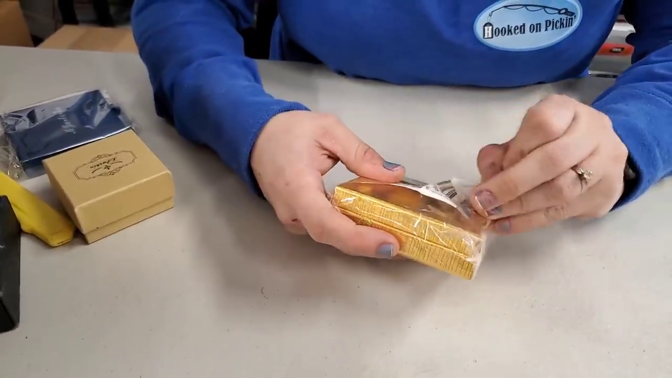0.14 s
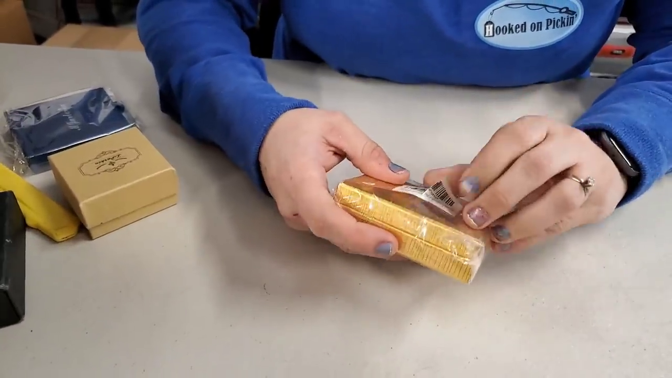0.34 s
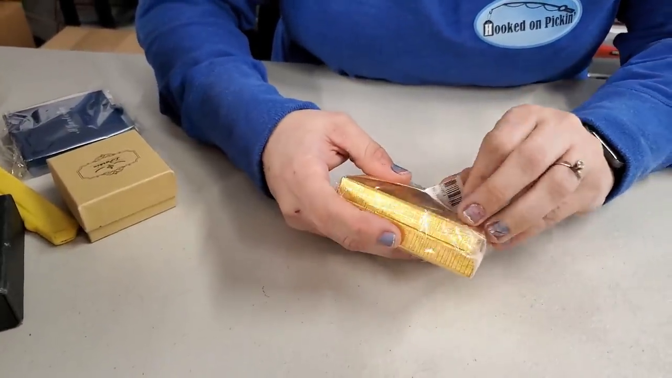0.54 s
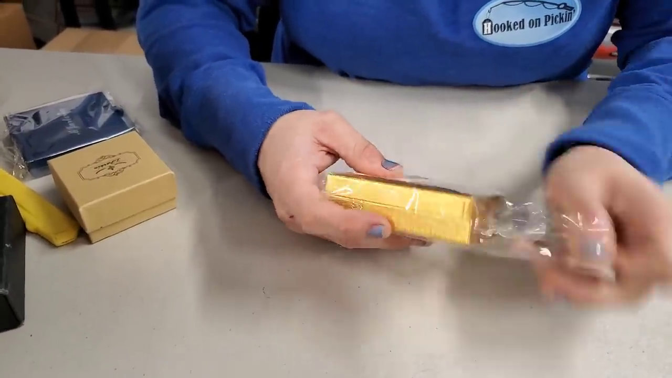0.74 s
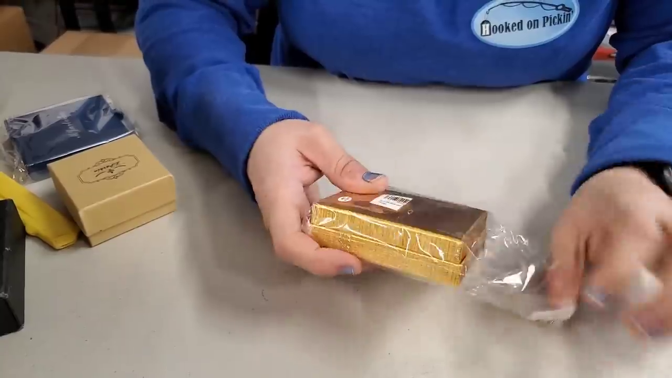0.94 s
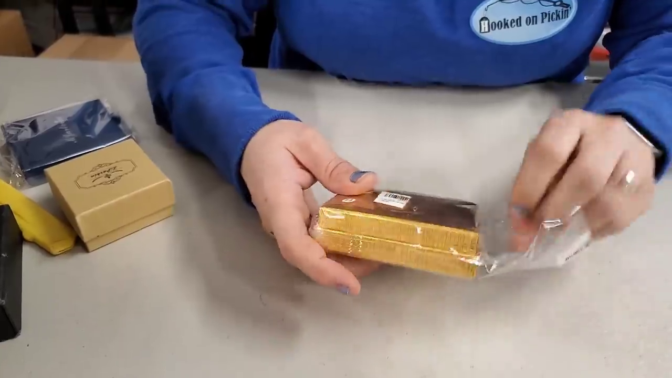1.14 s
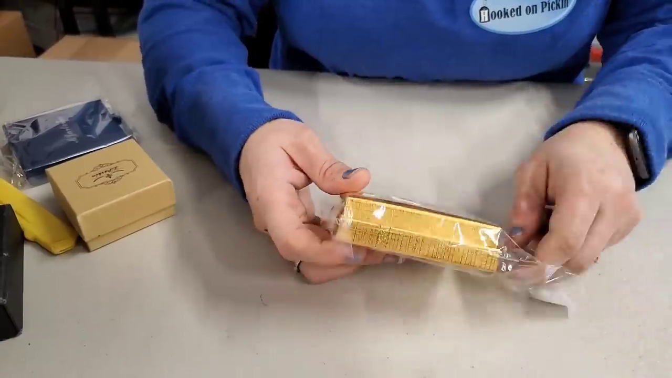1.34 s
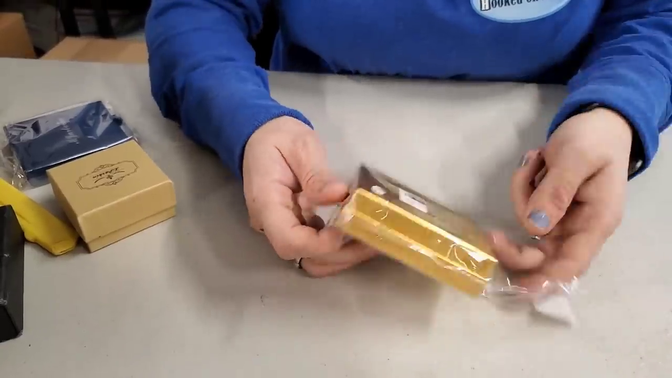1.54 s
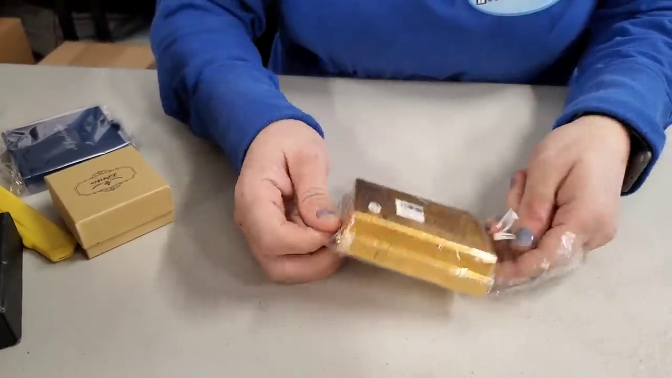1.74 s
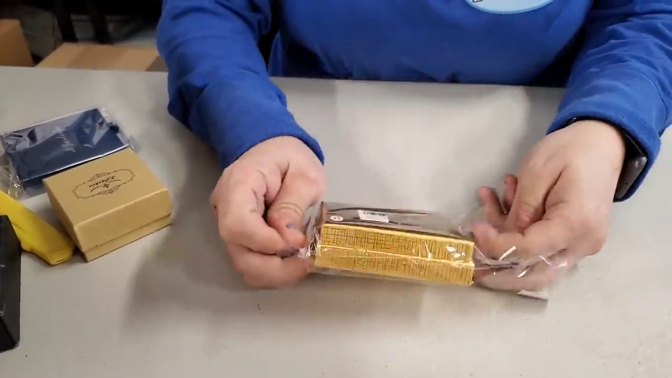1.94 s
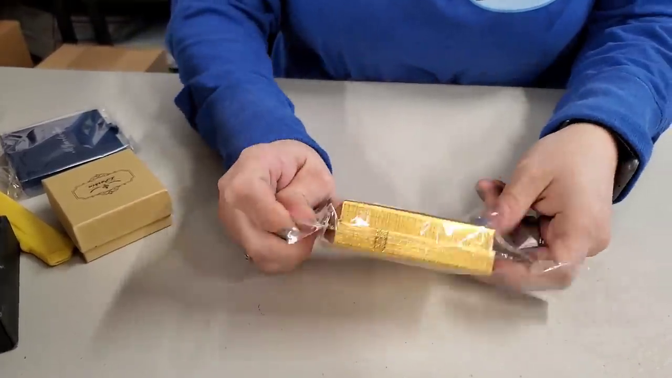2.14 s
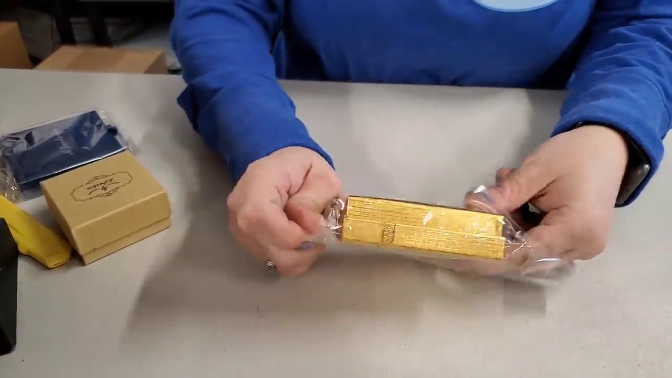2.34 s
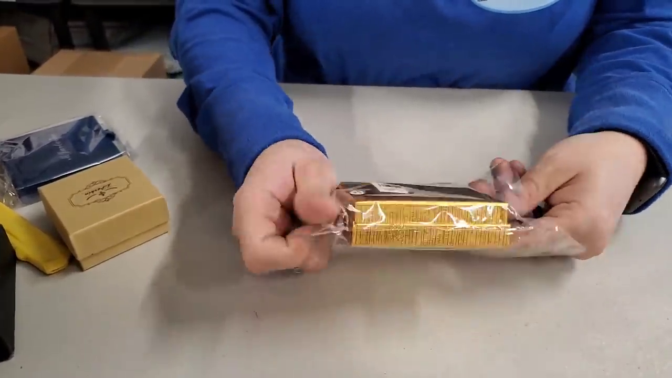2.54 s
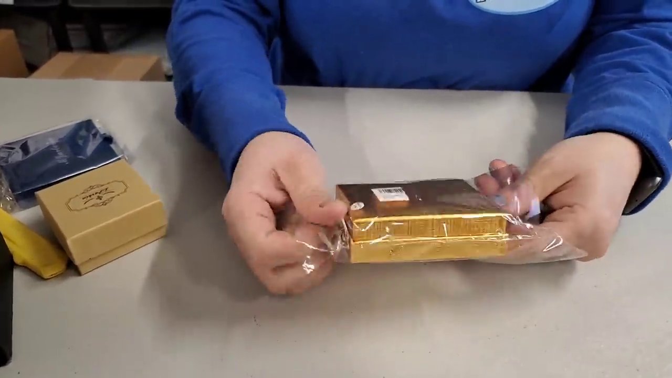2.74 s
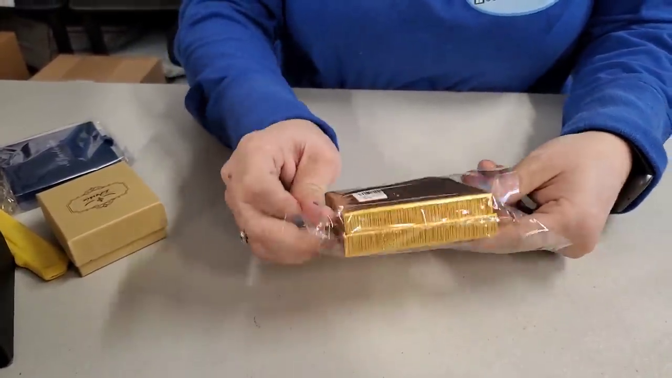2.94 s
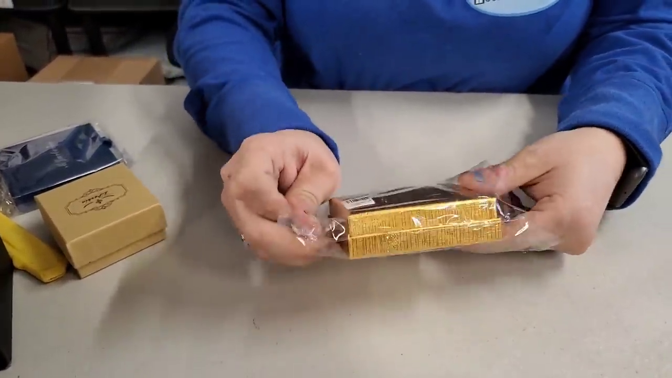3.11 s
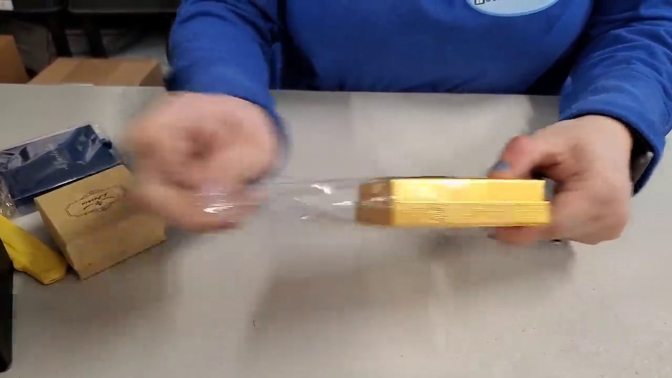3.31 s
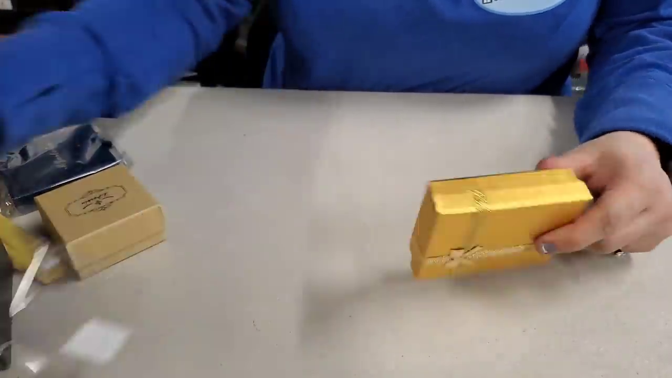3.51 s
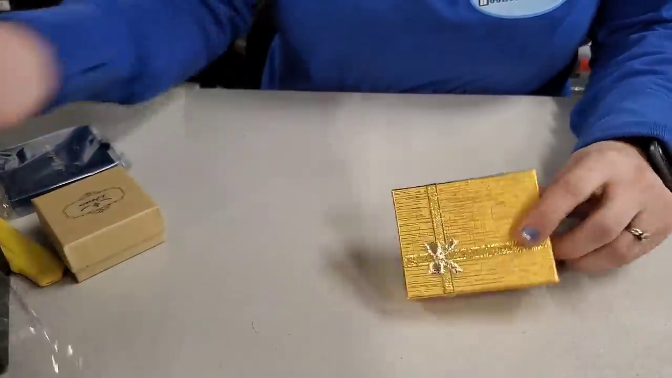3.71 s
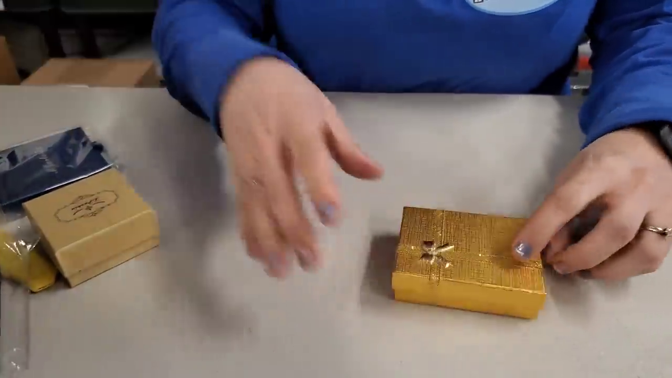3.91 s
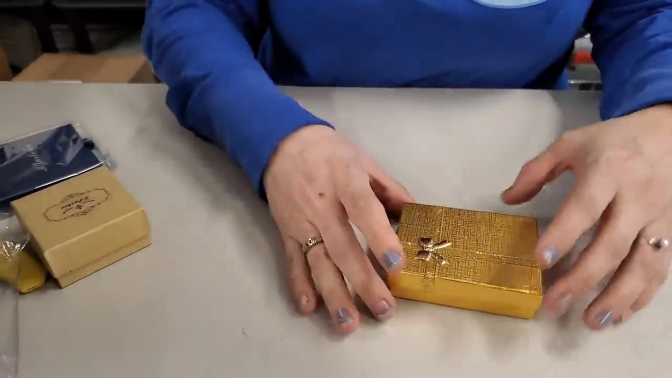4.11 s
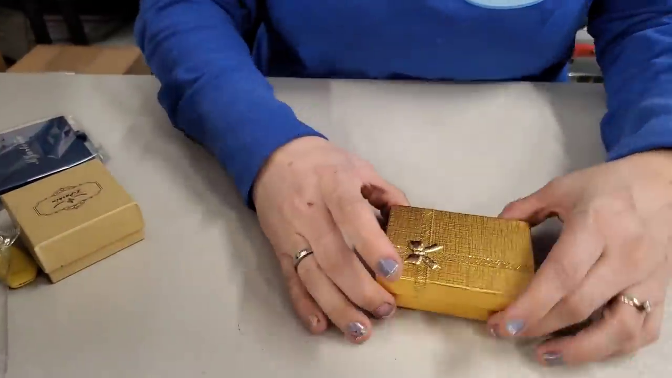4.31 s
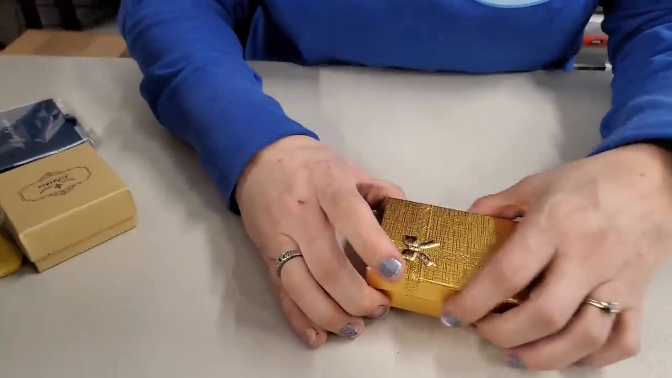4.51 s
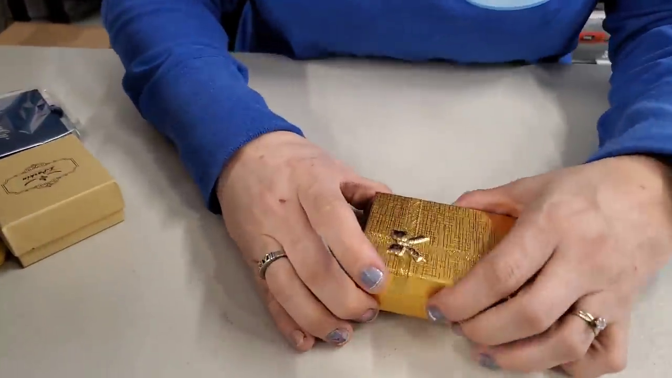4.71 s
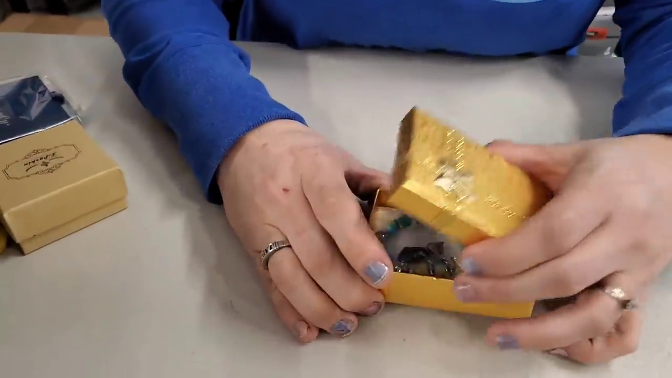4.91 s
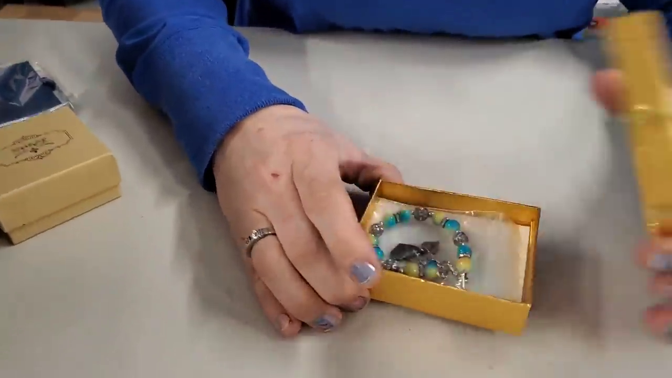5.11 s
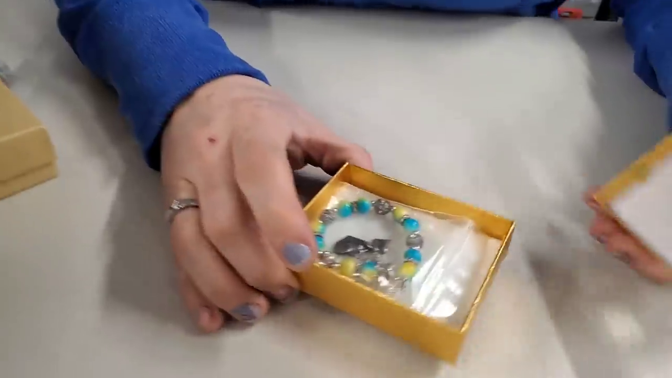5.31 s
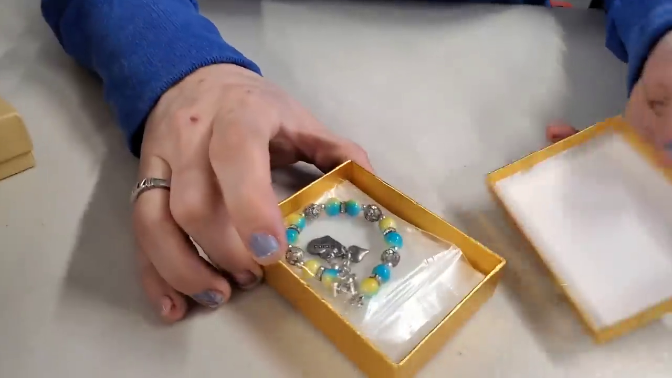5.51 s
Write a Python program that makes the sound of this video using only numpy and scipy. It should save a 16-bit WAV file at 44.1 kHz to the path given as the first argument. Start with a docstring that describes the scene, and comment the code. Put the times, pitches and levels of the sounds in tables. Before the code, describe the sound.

Loud plastic crinkling fills the first part, snaps popping over a continuous rustle with brief pauses for regripping and a table bump midway. The film slides off in one swish, and a dull knock follows. Afterwards come light taps of box and fingers, faint rubbing on card, a short scrape of the lid and a gentle set-down. Heard very close, nearer the right, with a short room tail and low background rumble.

```python
"""At a table, close to a stereo microphone: two hands peel stiff clear film off a small cardboard box.
Film: shaped noise bursts, dense small ones over a swish, loud snaps, one long pull. Box, wrists and lid
bump the table: struck decaying modes. Fingers rub and tick on card, the lid scrapes up and is laid down:
coloured hiss and dry bursts. Below lies a low rumble; a short room tail follows the near sounds.
The scene sits nearer the right microphone port, whose cavity rings in the treble."""
import sys
import numpy as np
from scipy import signal
from scipy.fft import rfft, irfft, next_fast_len
from scipy.io import wavfile
from scipy.ndimage import uniform_filter1d

SR = 44100
rng = np.random.default_rng(int(sys.argv[2]) if len(sys.argv) > 2 else 0)


def bounce(signal):
    """Save signal as a 16-bit WAV file at the path given by the first command-line argument."""
    frames = np.transpose(np.atleast_2d(signal))
    limited = np.clip(frames, -1, 1)
    pcm = np.round(limited * 32767).astype(np.int16)
    wavfile.write(sys.argv[1], SR, pcm)


N = 245063

# Table levels are relative: the functions add fixed offsets.


def amp(db):
    """dB to gain."""
    return 10 ** (np.asarray(db) / 20)


def unit(x):
    """Scaled to rms 1."""
    return x / np.sqrt(np.mean(x ** 2) + 1e-20)


def along(points, hz):
    """(f/Hz, value, ..) points read on a log axis, one row per value column."""
    f, *cols = np.transpose(points)
    return np.squeeze([np.interp(np.log(hz + 1), np.log(f + 1), c) for c in cols])


def curves(rows, t):
    """Each column after the time, read at the times t."""
    s, *cols = np.transpose(rows)
    return [np.interp(t, s, c) for c in cols]


def ends(hz, low_db, high_db, low_hz, high_hz):
    """dB of a spectrum whose two ends are lifted or lowered apart from its middle."""
    low = 1 / (1 + (hz / low_hz) ** 4)
    high = 1 / (1 + (high_hz / (hz + 1)) ** 8)
    return low * low_db + high * high_db


def bell(hz, centre_hz, width):
    """Resonance of height 1 on a log axis."""
    return np.exp(-(np.log(hz / centre_hz) / width) ** 2)


# likeness of the two ports: f/Hz, left-right correlation
LIKENESS = [(60, 0.92), (300, 0.97), (650, 0.86), (1400, 0.48), (3000, 0.068), (7000, 0.073)]


def paired(z, hz):
    """Two unrelated spectra mixed to be as alike as two ports hear them."""
    turn = np.arccos(np.clip(along(LIKENESS, hz.ravel()), 0, 1)).reshape(hz.shape) / 2
    common, apart = np.cos(turn) * z[0], np.sin(turn) * z[1]
    return np.array([common + apart, common - apart])


def sides(pan_db):
    """Left and right gains; negative pans right."""
    return amp(np.array([pan_db / 2, -pan_db / 2]))


def hiss(colour_db, patchy_db, size=256):
    """Stereo noise with patches of random gain; colour_db(hz, t) shapes it."""
    hz, t, z = signal.stft(rng.standard_normal((2, N)), SR, nperseg=size)
    field = uniform_filter1d(rng.standard_normal(z.shape[1:]), size=5, axis=0)
    field = uniform_filter1d(field, size=3, axis=1)
    z = paired(z, hz[:, None]) * amp(patchy_db * unit(field) + colour_db(hz[:, None], t))
    return signal.istft(z, SR, nperseg=size)[1][:, :N]


def causal(gain):
    """The same gains with minimum phase: a filter that rings only after it is struck."""
    cepstrum = irfft(np.log(gain + 1e-6))
    half = cepstrum.shape[-1] // 2
    cepstrum[..., 1:half] *= 2
    cepstrum[..., half + 1:] = 0
    return np.exp(rfft(cepstrum))


# film radiation: f/Hz, level/dB
FILM_COLOUR = [(200, -21.5), (450, -19), (780, -6), (1000, -5.5), (1500, -3), (2500, -1), (6000, -2.5),
               (10000, -6), (16000, -5)]


def pops(s, db, pitch_hz, low_db, bright_db, top_db, ms, ring_db, crack_db):
    """Sharp crack inside a spit of noise, strongest round the pitch of the panel that flips free."""
    size, lead = 768, 256  # samples; samples before the peak
    t_ms = (np.arange(size) - lead) / SR * 1000
    hz = np.fft.rfftfreq(size, 1 / SR)
    spit_env = amp(np.where(t_ms < 0, 28 * t_ms, -19 * t_ms) / ms[:, None])  # quick swell, slower fall
    crack_env = amp(crack_db + np.where(t_ms < 0, 40 * t_ms, -25 * t_ms))
    crack_env = crack_env * 3 / ms[:, None]  # long creases crack less
    noise = rng.standard_normal((len(s), 2, size)).swapaxes(0, 1)
    z = paired(rfft(noise * (spit_env + crack_env)), hz)

    panel_db = ring_db * bell(hz + 1, pitch_hz[:, None], 0.15)
    tilt_db = bright_db[:, None] / (1 + (4500 / (hz + 1)) ** 3)
    gain = amp(along(FILM_COLOUR, hz) + panel_db + tilt_db)
    band = (hz > 1500) * (hz < 10000)  # levels are set in this band, before the ends are bent
    strength = np.sqrt(np.mean(abs(z * gain * band) ** 2, axis=(0, 2)) / ms)
    gain = gain * amp(ends(hz, low_db[:, None], top_db[:, None], 2040, 7660))

    pan_db = -6 + 0.5 * rng.standard_normal(len(s))  # all to the right, slight random spread
    bursts = irfft(z * causal(gain)) * (sides(pan_db) * amp(db + 7.5) / strength)[..., None]
    at = (np.round(s * SR).astype(int)[:, None] + np.arange(size)).ravel()
    return np.array([np.bincount(at, side.ravel(), N + 2 * size)[lead:][:N] for side in bursts])


# moving film: t/s, level/dB, low end/dB
FILM_MOTION = [(0.0, -32.5, -14), (0.2, -34.5, -13.5), (0.41, -41.5, -7), (0.62, -32.5, -10),
               (0.72, -29, -14.5), (0.85, -23.5, -13), (0.95, -34.5, -7.5), (1.25, -35.5, -12),
               (1.44, -31, -8), (1.65, -34.5, -7), (1.85, -36, -3), (2.08, -30, -7.5), (2.42, -32.5, -8),
               (3.16, -33, -12.5), (3.3, -29, -12), (3.45, -30, -7.5), (3.52, -34, -16), (3.67, -33.5, -13),
               (3.7, -44, -1), (3.76, -66, -13)]
# fingers stop and regrip: middle t/s, length/s, depth/dB (negative lifts)
REGRIPS = [(0.441, 0.04, 6), (0.484, 0.071, 9.5), (0.584, 0.023, 10.5), (1.045, 0.037, 4.5),
           (1.187, 0.034, 20), (1.497, 0.13, 7.5), (1.797, 0.032, 10), (2.07, 0.082, 8.5),
           (2.493, 0.041, 2.5), (2.8, 0.015, -2), (3.202, 0.04, 13), (3.527, 0.034, 4), (3.591, 0.06, 15.5)]
FILM_TREBLE_DB, DULLING_DB_PER_DB = 2.5, 0.2  # treble; treble lost per dB of pause


def film_at(t):
    """Level, low end and treble of the moving film at t; pauses hush and dull it."""
    db, low_db = curves(FILM_MOTION, t)
    hush_db = sum(depth * np.exp(-(2 * (t - s) / length) ** 4) for s, length, depth in REGRIPS)
    return db - hush_db, low_db, FILM_TREBLE_DB - DULLING_DB_PER_DB * hush_db


def crackle():
    """Many small creases at chance moments over the swish of sliding film."""
    end_s = FILM_MOTION[-1][0]
    draw = rng.random((1050, 6))
    s = draw[:, 0] * end_s
    db, low_db, high_db = film_at(s)
    size_db = -3.6 * np.log(draw[:, 1] + 0.022)  # few large, many small
    clump_db = 2.26 * np.interp(s, np.linspace(0, 4, num=200), rng.standard_normal(200))
    pitch_hz = 1500 * 7 ** draw[:, 2]
    ms = 1.3 + 3.2 * draw[:, 3]
    bright_db = 12 * draw[:, 4] - 6
    grain_low_db = low_db + 14 * draw[:, 5]
    grains = pops(s, db + size_db + clump_db + 6.0, pitch_hz, grain_low_db, bright_db, high_db - 1.5, ms,
                  ring_db=8, crack_db=-19)

    def swish_db(hz, t):
        db, low_db, high_db = film_at(t)
        level_db = np.where(t < end_s, db - 2.0, -150)
        film_db = along(FILM_COLOUR, hz.ravel())[:, None]
        return level_db + film_db + ends(hz, low_db + 10.5, high_db - 31.0, 1700, 10300)

    return grains + hiss(swish_db, patchy_db=7.5) * sides(-0.5)[:, None]


# table trembling under the forearms, low murmur of the room: t/s, level/dB, deep level/dB
TREMBLE = [(0.0, -57, -50), (0.45, -67, -56), (0.9, -52.5, -68), (1.2, -57, -66), (1.6, -54, -65),
           (1.8, -51.5, -55), (2.0, -60, -67), (2.7, -73.5, -72), (3.6, -65, -61), (3.87, -53, -55),
           (4.13, -67, -45), (4.35, -65, -59), (4.65, -61.5, -64), (5.14, -70, -58), (5.56, -53, -61)]


def rumble():
    """Low noise, deep part set apart below 130 Hz, that falls off towards the middle range."""
    def low_db(hz, t):
        db, deep_db = curves(TREMBLE, t)
        deep = 1 / (1 + (hz / 130) ** 4)
        return 20.0 + deep * (deep_db - 0.5) + (1 - deep) * db - 20 * np.log10(1 + (hz / 330) ** 3)

    return hiss(low_db, patchy_db=3.5, size=2048) * sides(-7.5)[:, None]


# loudest buckling creases: peak t/s, level/dB, f/Hz, brightness/dB, length/ms
SNAP_EVENTS = [(0.0048, -20, 8000, -7, 16), (0.0098, -18, 8740, 15, 4.4), (0.0325, -15.5, 3170, -10, 2.9),
               (0.0789, -7, 5100, 0.5, 5), (0.0875, -17.5, 3300, -7, 7.6), (0.11, -15.5, 2710, -13.5, 4.9),
               (0.1443, -7, 5100, 10, 4.1), (0.151, -10.5, 3060, -3.5, 5.6),
               (0.1655, -12.5, 9000, 10.5, 6.3), (0.1702, -18, 8310, -0.5, 20),
               (0.1864, -13.5, 7440, -3, 12), (0.1936, -12, 3340, 8.5, 6.7), (0.2013, -14, 9040, 3, 3.1),
               (0.207, -10, 8800, 2.5, 5.3), (0.2116, -8, 7260, 14, 3.7), (0.2206, -6, 7620, -9, 2.8),
               (0.2456, -13.5, 5860, 15.5, 3.8), (0.2529, -7, 6000, 3, 5.2), (0.2938, -16, 5000, 10.5, 6.7),
               (0.308, -26, 8440, 14, 7.2), (0.319, -18.5, 7500, 5, 8), (0.3474, -10, 9000, 8.5, 2.7),
               (0.3724, -16.5, 5170, -0.5, 8.3), (0.383, -18, 5200, 4, 12), (0.397, -22, 5510, 1, 36),
               (0.4082, -19, 5510, 6, 3.0), (0.4467, -14.5, 5030, 4.5, 2.5), (0.4928, -23, 7880, -3.5, 5.6),
               (0.549, -8.5, 5340, -6.5, 2.4), (0.557, -29, 5210, 4, 5.6), (0.5676, -18, 7500, 11, 3.6),
               (0.5966, -28, 8960, 21, 2.8), (0.609, -16, 7860, 4, 6.7), (0.6341, -25, 2110, 5, 26),
               (0.6569, -6, 9450, -2, 4.1), (0.685, -13, 8760, -2.5, 8.8), (0.6988, -6, 7400, -10, 3.8),
               (0.738, -22.5, 4610, 4.5, 5.6), (0.7452, -13.5, 4600, 11, 4.2),
               (0.7748, -8.5, 8530, 2.5, 4.3), (0.7882, -15, 8250, 2, 3.2), (0.7948, -8.5, 8530, 4.5, 6.4),
               (0.8101, -9.5, 3770, 6.5, 8.5), (0.818, -13.5, 5680, -13.5, 10), (0.842, -1.5, 2900, 1, 3.7),
               (0.857, -12, 2630, -10.5, 16.0), (0.866, -13, 2580, 1, 7.3), (0.8734, -19.5, 2760, -1, 7.6),
               (0.9016, -14, 7710, 4, 4.2), (0.9124, -12.5, 5760, 3.5, 5.7), (0.95, -19.5, 4440, 5, 9.9),
               (0.9558, -16, 2930, 1, 7.5), (0.9669, -12, 2370, 2.5, 3.2), (1.0046, -18, 4440, 2, 9.7),
               (1.008, -7, 5900, 13, 2.7), (1.0462, -18.5, 7710, 4, 3.9), (1.0671, -14.5, 2360, -6.5, 8.5),
               (1.082, -24.5, 7710, 3, 3.1), (1.0944, -16.5, 6800, 1.5, 13), (1.0989, -11.5, 4400, 10, 5.1),
               (1.1045, -18, 2840, -1, 17), (1.118, -10, 4480, 7, 4.4), (1.1485, -17, 2230, -2, 7.7),
               (1.1617, -13.5, 5170, -3, 2.5), (1.2159, -22.5, 7970, -9, 14), (1.233, -14, 4700, 3.5, 8.6),
               (1.2556, -14, 7900, -9, 5.9), (1.2774, -19, 5640, 8.5, 4.2), (1.2929, -17.5, 3960, 4, 4),
               (1.3052, -15, 5000, 21, 6), (1.332, -21, 7300, 4, 8.9), (1.3405, -20.5, 3030, -2, 14),
               (1.3577, -21.5, 6650, 3, 11), (1.3635, -21.5, 4390, 5.5, 15), (1.3953, -19, 8900, -3.5, 12),
               (1.4299, -9.5, 4670, -4, 5.3), (1.4378, -15, 2980, 1.5, 5), (1.4564, -18, 5600, 10, 4.1),
               (1.603, -13.5, 1890, 7.5, 4.5), (1.628, -16.5, 2630, 2, 6), (1.6416, -24, 8660, -4, 9.6),
               (1.6745, -16, 5210, 4.5, 3.3), (1.6926, -11.5, 2250, -1, 3.6), (1.7, -17.5, 1890, -7, 3.2),
               (1.7244, -11.5, 5440, 8, 2), (1.7358, -5, 8180, 17, 1.3), (1.742, -29.5, 1600, 2, 3.4),
               (1.7482, -11.5, 1400, -30, 10.2), (1.7527, -23, 1770, -19, 2.2), (1.8102, -15, 2760, 4, 2.2),
               (1.8235, -18.5, 1510, 12, 6.7), (1.8338, -20.5, 2970, -0.5, 14), (1.841, -9, 3100, -8, 5.5),
               (1.859, -16.5, 2480, -4.5, 5.6), (1.8735, -14.5, 1810, -4, 4.4),
               (1.8994, -12.5, 8550, -5.5, 6.6), (1.9037, -17, 1870, -5, 6.7),
               (1.9514, -18.5, 1810, 3.5, 4), (1.9571, -15.5, 2150, -0.5, 9.5),
               (1.9857, -15.5, 1510, 0.5, 5), (1.9897, -10.5, 2110, 4, 5.2), (1.9976, -15.0, 1860, -6, 3),
               (2.0029, -10.5, 2230, 2.5, 4.5), (2.0314, -7.5, 7760, -4, 3.8),
               (2.0556, -17.5, 2180, -10, 2.8), (2.0606, -13.5, 3080, -7, 4.1), (2.0741, -6, 1510, 12, 2.5),
               (2.0806, -11.5, 8530, -5, 8.5), (2.1024, -29.5, 2110, 2.5, 2.8),
               (2.1256, -13, 5600, 16, 3.9), (2.1439, -12.5, 2150, -4, 3.6),
               (2.153, -10.5, 2270, -10.5, 9.5), (2.1589, -8, 5440, 4, 8.7), (2.1754, -12, 2300, -3.5, 10),
               (2.2249, -13, 2440, -1.5, 13), (2.2326, -26.5, 2600, -3, 16.0), (2.2383, -10, 2330, -8, 7.9),
               (2.2583, -14.5, 2210, 1.5, 3.4), (2.2957, -10, 1730, 0.5, 4.6),
               (2.3148, -18.5, 1770, 5, 1.4), (2.3385, -20.5, 5680, 10.5, 8.3),
               (2.3447, -33.5, 5040, 3, 4.4), (2.352, -21, 2700, -14.5, 11), (2.401, -13, 1720, 0.5, 2.6),
               (2.4132, -13.5, 5730, -6, 11.0), (2.4382, -12, 1650, -1.5, 7.9),
               (2.4554, -12, 1480, -6, 6.9), (2.5094, -22, 4480, 3.5, 6.2), (2.5176, -15, 5170, 0, 4.7),
               (2.5306, -16.5, 4130, 3.5, 6.7), (2.5418, -9, 4440, 4, 2.4), (2.558, -13, 2200, -3, 7.8),
               (2.5664, -17.5, 8700, 6, 3.8), (2.572, -20, 5940, 9, 4.8), (2.585, -13, 2300, 4.5, 6),
               (2.5951, -13, 3100, -7.5, 5.6), (2.6183, -10.5, 7900, 4.5, 9.2),
               (2.6319, -11.5, 2150, 1, 3.1), (2.6404, -14, 7900, 7, 2.4), (2.6502, -14.5, 4700, 2, 3.9),
               (2.6756, -17.5, 3450, 16, 3), (2.6932, -17, 5600, 1, 4.5), (2.7023, -14.5, 8700, -6.5, 4.8),
               (2.7102, -26.5, 5860, -4.5, 5.7), (2.7551, -8, 2110, -6, 2.4), (2.767, -11.5, 7190, 11, 5.7),
               (2.7787, -14.5, 1600, -6, 7.4), (2.8179, -12.5, 2000, 2.5, 5.7),
               (2.8291, -10, 1680, -2, 2.9), (2.8512, -9, 7060, 1.5, 6.7), (2.8635, -7, 3360, -0.5, 4.6),
               (2.869, -10.0, 8610, 0, 7), (2.8768, -9.5, 6050, -1, 8.2), (2.9091, -7, 1850, 1.5, 3.7),
               (2.9234, -20, 6070, 2.5, 2.3), (2.9312, -13, 5600, 1.5, 14), (2.9428, -14.5, 9700, 0.5, 8.7),
               (2.9616, -15.5, 8310, -3, 9.5), (2.9917, -7, 7490, 4, 4.9), (3.0054, -17.0, 3620, 2.5, 3.7),
               (3.022, -16.0, 8270, 14, 3.4), (3.0305, -14.5, 7960, 6.5, 8.3),
               (3.0437, -11.5, 7580, 11, 3.5), (3.0519, -26.5, 3790, 6.5, 2.1),
               (3.0692, -8.5, 5200, 5, 4.2), (3.0778, -19, 4910, 1.5, 3), (3.1024, -9.5, 2800, -1.5, 7.4),
               (3.1135, -5.5, 2670, 6, 2.2), (3.1187, -12, 5170, 2.5, 3.6), (3.149, -17, 2000, -25.5, 5),
               (3.1653, -12.5, 5850, 14, 3), (3.2202, -9, 4350, 5, 3), (3.2299, -15.5, 2250, -11, 11),
               (3.236, -15.5, 2450, -10.5, 16.0), (3.2438, -25, 4260, 5, 11), (3.274, -10.5, 3830, 2, 5.4),
               (3.2907, -16.5, 2370, -3, 4.4), (3.301, -8.5, 4360, 6.5, 2.5), (3.3261, -8, 2650, -3, 5.3),
               (3.3374, -19.5, 3190, -6, 15), (3.347, -24, 4180, 3, 16.0), (3.352, -14, 7800, -2, 18),
               (3.3561, -14.5, 8230, 6.5, 8.6), (3.3867, -7.5, 3160, 3, 7.8), (3.4065, -9, 7490, 0.5, 12),
               (3.4181, -16.5, 3080, -8, 21), (3.427, -19.5, 3060, 7.5, 8.3),
               (3.4432, -12.5, 3190, 4.5, 5.9), (3.4595, -12.5, 5860, 8, 4.9),
               (3.4694, -12, 6000, -0.5, 4.7), (3.4964, -18, 2300, -11, 16),
               (3.5042, -17.5, 7700, -1.5, 4.5), (3.5589, -13.5, 7060, -3.5, 6.3),
               (3.5871, -11, 2820, -6.5, 4.4), (3.6015, -22, 2540, -12, 4.5),
               (3.614, -16.5, 2600, -2.5, 3.7), (3.6197, -11.5, 6600, 5, 2.9), (3.652, -19.5, 2500, 4, 12),
               (3.6649, -10, 6500, 1, 4.2), (3.6751, -5, 6040, 1.5, 5.5)]
SNAP_LOW_DB, SNAP_TOP_DB = 7, 1.6  # low end over that of the crackle; top end


def snaps():
    """The single loud creases; their low end follows that of the crackle."""
    s, db, pitch_hz, bright_db, ms = np.transpose(SNAP_EVENTS)
    low_db = film_at(s)[1] + SNAP_LOW_DB
    top_db = np.full(len(s), SNAP_TOP_DB)
    return pops(s, db, pitch_hz, low_db, bright_db, top_db, ms, ring_db=7, crack_db=3.5)


# modes of table top and box: nominal f/Hz, level/dB, t60/s
TABLE_MODES = [(65, -15, 0.28), (84.3, -3, 0.18), (118.3, -0.5, 0.16), (153, 1.5, 0.086), (210, 2, 0.046),
               (255.6, 0, 0.068), (311.4, -6.5, 0.11), (355, -5.5, 0.085), (498, -3, 0.025),
               (748, -4, 0.035), (1024, -10.5, 0.027), (1175, -44.5, 0.0078), (1563, -9, 0.021)]
# box, wrists and lid meeting the table: t/s, level/dB, favoured f/Hz, thud/dB, knock/dB
BUMP_EVENTS = [(0.103, -30.5, 260, -26, -30), (0.345, -37, 256, -46, 1), (0.656, -30.5, 249, -1, 12.5),
               (0.84, -32.5, 339, -10, 3), (0.877, -32.5, 131, 2.5, -9), (0.915, -42, 72.7, 9, -7),
               (0.985, -26.5, 150, -11, -22), (1.313, -34.5, 301, -24, -6), (1.463, -30, 337, -41, -13),
               (1.582, -30, 83.4, -9, -11), (1.746, -9, 170, -24, -45), (1.884, -29, 221, -9, -17),
               (2.215, -34, 83, -11, -11), (3.069, -41, 358, -14, -8), (3.672, -10, 214, -10, -1),
               (3.692, -34, 207, -19.5, -20), (3.731, -23.5, 205, -21, -13), (3.904, -21.5, 298, -36, -2),
               (3.991, -20, 300, 2.5, -1), (4.003, -16, 240, -11.5, -3), (4.049, -32.5, 113, 2, -25),
               (4.098, -40.5, 77.7, 7.5, -24), (4.143, -41.5, 75.2, 5.5, -21),
               (4.292, -34.5, 76.4, -3, -37), (4.424, -31.5, 149, -32, -10), (4.663, -40.5, 76.7, -12, -9),
               (4.777, -36, 253, -27, -19), (5.496, -18.5, 400, -15, -3)]


def bumps():
    """Every contact rings the table: soft ones only its low modes, hard corners also the box."""
    out, t = np.zeros(N + SR), np.arange(SR // 3) / SR
    hz, level_db, t60_s = np.transpose(TABLE_MODES)[..., None]
    for s, db, pitch_hz, thud_db, knock_db in BUMP_EVENTS:
        place_db = 8 * bell(hz, pitch_hz, 0.22)  # the spot that is hit favours some modes
        mode_db = level_db + place_db + ends(hz, thud_db + 3.5, knock_db + 14.5, 156, 437)
        mode_db = mode_db + rng.normal(0, 1.5, hz.shape)
        mode_hz = hz * (1 + rng.normal(0, 0.027, hz.shape))
        ring = amp(mode_db - 60 * t / t60_s) * np.sin(2 * np.pi * mode_hz * t)
        attack = 1 - np.exp(-t / 0.0015)
        start = round((s + 0.002) * SR)
        out[start:][:len(t)] += amp(db - 11) * attack * ring.sum(0)
    return out[:N] * sides(-7.5)[:, None]


PULL_MIDDLE_S, PULL_LENGTH_S, PULL_DB = 3.39, 0.11, -14  # length: between the -9 dB points


def pull():
    """The film sleeve drawn off the box in one pull: a dense swish that swells and fades."""
    def pull_db(hz, t):
        db = PULL_DB - 9 * (2 * (t - PULL_MIDDLE_S) / PULL_LENGTH_S) ** 2
        film_db = along(FILM_COLOUR, hz.ravel())[:, None]
        return np.maximum(db, -150) + film_db + ends(hz, -6.5, 1, 1600, 8000)

    return hiss(pull_db, patchy_db=3) * sides(-3)[:, None]


# skin and sleeves on card and table: t/s, level/dB, low end/dB, treble/dB
RUB_MOTION = [(3.68, -52, 18, 17.5), (3.76, -57, 5.5, 3.5), (3.89, -67, 8, -1.5), (3.96, -51.5, 9.5, -4.5),
              (4.05, -53, 8, -2), (4.2, -60.5, -11, -2), (4.3, -57, 0, 2), (4.42, -60.5, -3.5, -2),
              (4.58, -58, 1.5, 2.5), (4.74, -60.5, 0, -10.5), (4.92, -60, 5, 2), (5.07, -65.5, -9, -5.5),
              (5.3, -59, -17, -2.5), (5.35, -49, -17, -7), (5.41, -55, -12, -3.5), (5.48, -51.5, -22, -3),
              (5.557, -42, 12, -8)]
# card radiation: f/Hz, level/dB
CARD_COLOUR = [(300, -24), (500, -8), (900, -3.5), (1500, -1), (2500, -2.5), (3600, 0), (6000, -5),
               (15000, -11.5)]
HOLLOW_HZ = 2620  # air under hand or lid


def rub():
    """Soft friction; the hollow under hand or lid rings softly."""
    def rub_db(hz, t):
        db, low_db, high_db = curves(RUB_MOTION, t)
        level_db = np.where(t > RUB_MOTION[0][0], db + 10.5, -150)
        hollow_db = 7 * bell(hz + 1, HOLLOW_HZ, 0.16)
        card_db = along(CARD_COLOUR, hz.ravel())[:, None] + ends(hz, low_db + 5.5, high_db, 1240, 3400)
        return level_db + card_db + hollow_db

    return hiss(rub_db, patchy_db=1.0) * sides(-5.0)[:, None]


# fingertips, film scraps and lid edges on the card:
# peak t/s, level/dB, f/Hz, low end/dB, brightness/dB, length/ms
TICK_EVENTS = [(3.7846, -34.5, 5940, -9, 11, 4.9), (3.8354, -42, 2410, 6, 4, 13),
               (3.8886, -29.5, 6200, 2, -2, 5), (3.907, -22.5, 2200, 2, -24, 5.4),
               (3.9573, -31.5, 2410, -11, -10, 14), (3.9727, -29.5, 6500, 4, -4.5, 4.4),
               (3.9935, -17, 2730, 7, -1, 5.7), (4.004, -15.5, 2800, 7, -15, 6.9),
               (4.0648, -25, 8180, -5, 26, 3.4), (4.227, -24.5, 8340, -5, 19, 3.8),
               (4.2792, -27.5, 2410, 1, 10, 5.7), (4.318, -31, 4910, 2, 3, 5.4),
               (4.7765, -34.5, 8350, 8, 16, 8), (4.852, -32, 1360, 6, -9, 4),
               (4.9897, -47, 2580, 10.5, 0, 17), (5.2238, -45, 2930, -9, -15, 14),
               (5.4934, -19, 2950, -11, -25, 4.2), (5.5006, -21, 2900, -4, -22, 13),
               (5.5132, -12, 2820, -14, -26, 13), (5.525, -14, 2820, -9.5, -21, 13.4),
               (5.5478, -29, 2730, 2, -17, 14)]
TICK_TOP_DB = -6


def ticks():
    """Small dry contacts on the card, with a duller top end than the film snaps."""
    s, db, pitch_hz, low_db, bright_db, ms = np.transpose(TICK_EVENTS)
    top_db = np.full(len(s), TICK_TOP_DB)
    return pops(s, db, pitch_hz, low_db, bright_db, top_db, ms, ring_db=7, crack_db=13)


LIFT_START_S, LIFT_PEAK_S, LIFT_END_S = 4.772, 4.852, 4.91
LIFT_DB, LIFT_FADE_DB = -36.5, 21
WALL_HZ, WALL_SWELL_DB, LIFT_DULLING_DB = 1200, 6, 3.5


def lift():
    """Lid scrapes up the box wall: catches at once, wall hums more, hiss dulls, then fades to release."""
    def lift_db(hz, t):
        drag = np.clip((t - LIFT_START_S) / (LIFT_PEAK_S - LIFT_START_S), 0, 1)
        release = np.clip((t - LIFT_PEAK_S) / (LIFT_END_S - LIFT_PEAK_S), 0, 1)
        sliding = (t > LIFT_START_S) & (t < LIFT_END_S)
        level_db = np.where(sliding, LIFT_DB - LIFT_FADE_DB * release, -150)
        wall_db = WALL_SWELL_DB * drag * bell(hz + 1, WALL_HZ, 0.8)
        ends_db = ends(hz, 10, -1.5 - LIFT_DULLING_DB * drag, 1130, 4400)
        return level_db + along(CARD_COLOUR, hz.ravel())[:, None] + ends_db + wall_db

    return hiss(lift_db, patchy_db=3.5) * sides(-5.0)[:, None]


# room decay: f/Hz, t60/s
ROOM_DECAY = [(200, 0.17), (2000, 0.13), (12000, 0.014)]


def room(x):
    """Noise tail in which each frequency dies at its own speed, 200 samples late."""
    hz, t, z = signal.stft(rng.standard_normal((2, SR // 3)), SR, nperseg=256)
    decay = amp(-60 * t / along(ROOM_DECAY, hz)[:, None])
    tail = signal.istft(paired(z, hz[:, None]) * decay, SR, nperseg=256)[1]
    tail = tail / np.linalg.norm(tail[0])
    return signal.fftconvolve(np.pad(x, ((0, 0), (200, 0))), tail, axes=1)[:, :N]


def scene():
    """Film, box and hands, with a little room."""
    near = snaps() + crackle() + ticks() + bumps()
    return near + amp(-15.0) * room(near) + rub() + lift() + pull() + rumble()


# microphone ports: f/Hz, left/dB, right/dB
PORT_COLOUR = [(60, 8.5, 3.5), (534, 4.5, 0.5), (866, -0.5, -3), (1414, -4, -3.5), (2530, -5.5, -2.5),
               (3800, -4.5, -4), (6140, -2.5, -4), (6570, -8.5, -4), (8600, -1.5, -3.5), (9940, 1, -13),
               (11530, -10.5, 8.5), (12450, -5, -1.5), (12970, 2.5, -2.5), (14730, -16.5, -6.5),
               (16200, -56.5, -31.5)]
BAND_LIMIT_HZ = 16450


def record(dry):
    """Ports colour the sound and lose deep bass; peaks are squeezed, then the band is limited."""
    m = next_fast_len(N + 8192)
    hz = np.fft.rfftfreq(m, 1 / SR)
    bass = 1 / (1 + (52 / (hz + 1)) ** 2.1)
    heard = irfft(rfft(dry, m) * amp(along(PORT_COLOUR, hz)) * bass, m)
    squeezed = heard / (1 + abs(heard) ** 5) ** (1 / 5)
    return irfft(rfft(squeezed) * (hz < BAND_LIMIT_HZ), m)[:, :N]


dry = scene()
out = record(dry)
bounce(out)
```